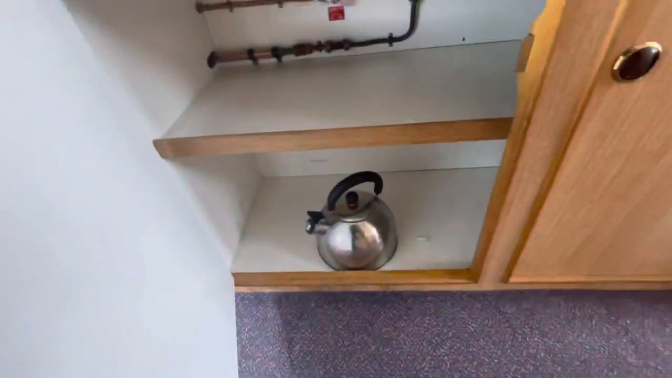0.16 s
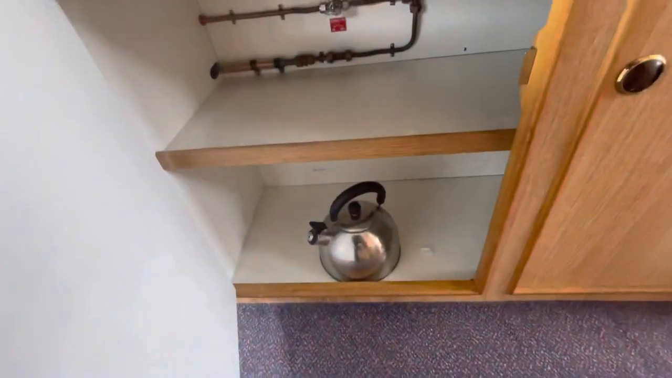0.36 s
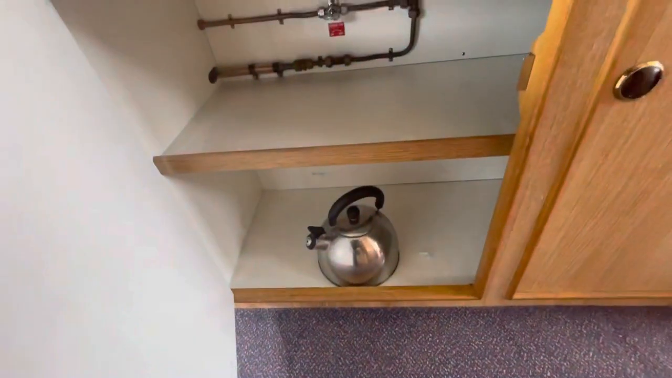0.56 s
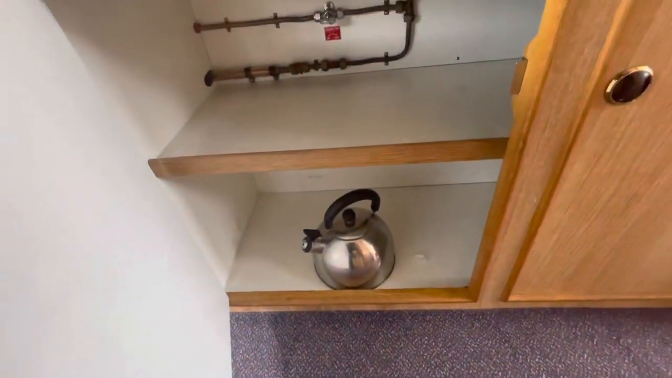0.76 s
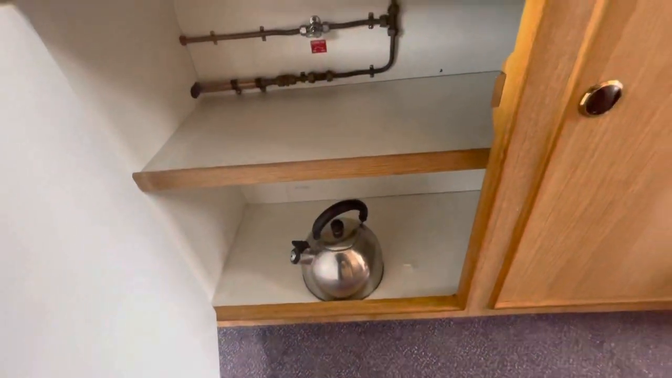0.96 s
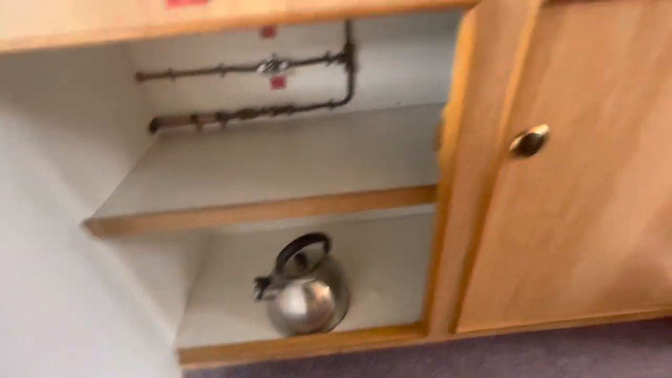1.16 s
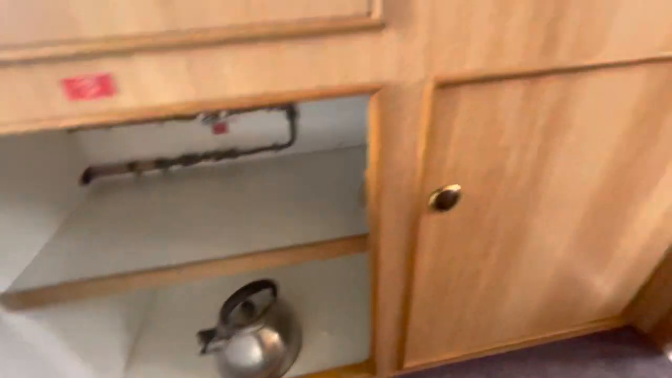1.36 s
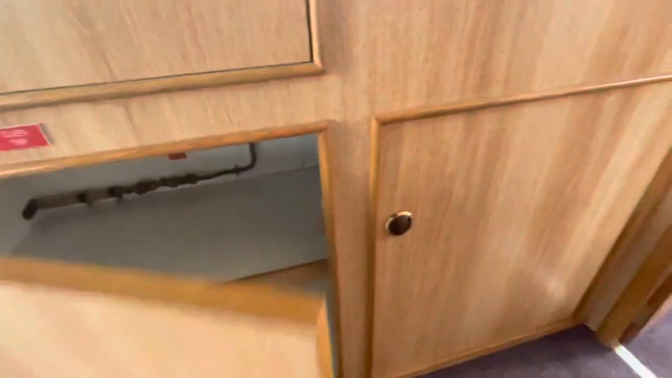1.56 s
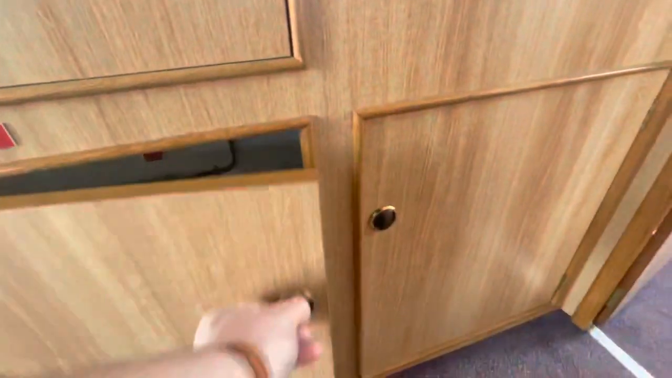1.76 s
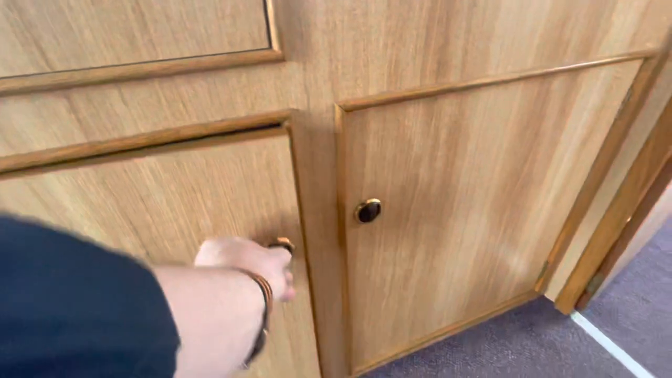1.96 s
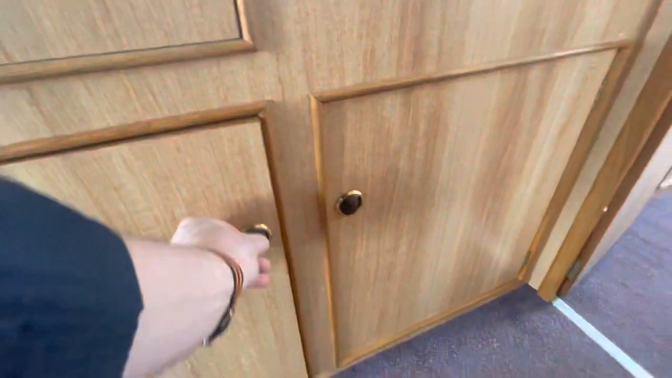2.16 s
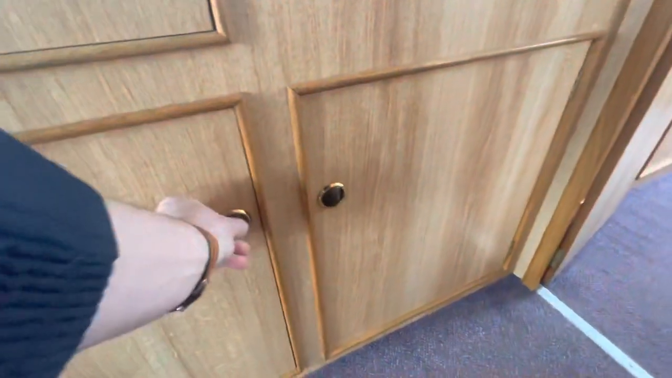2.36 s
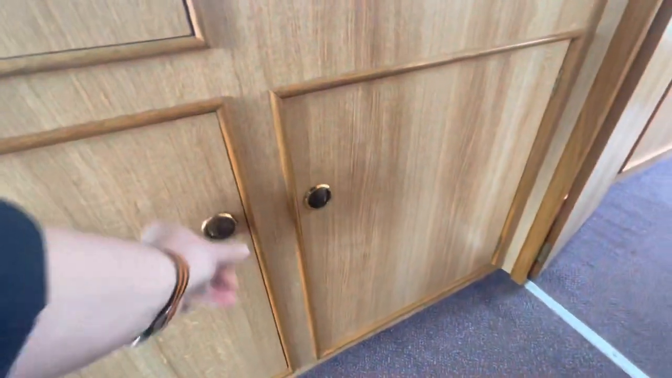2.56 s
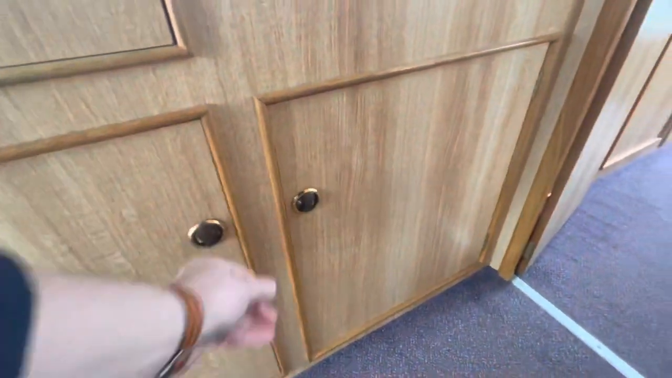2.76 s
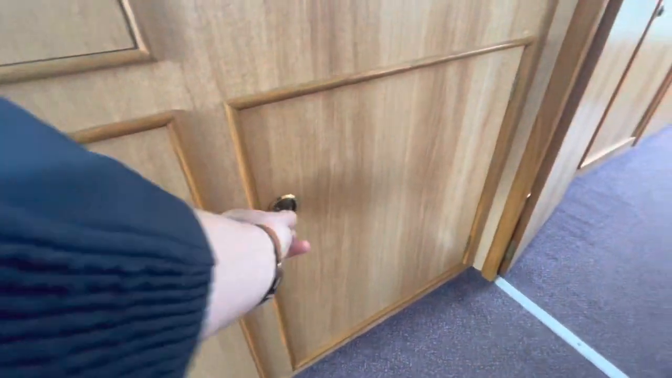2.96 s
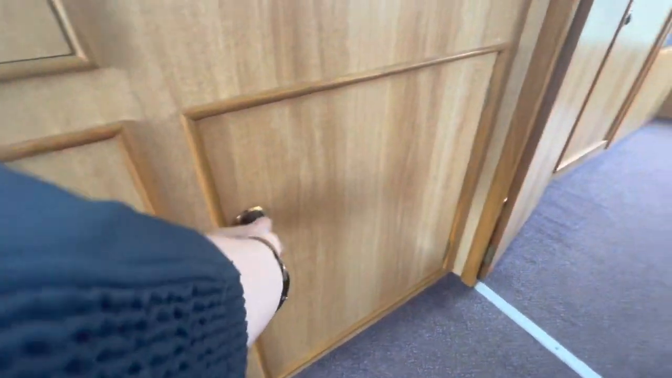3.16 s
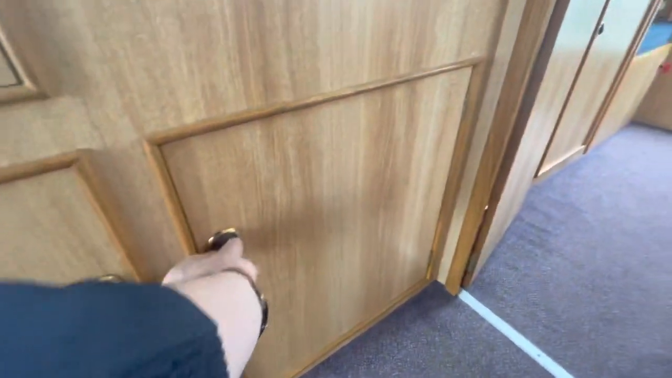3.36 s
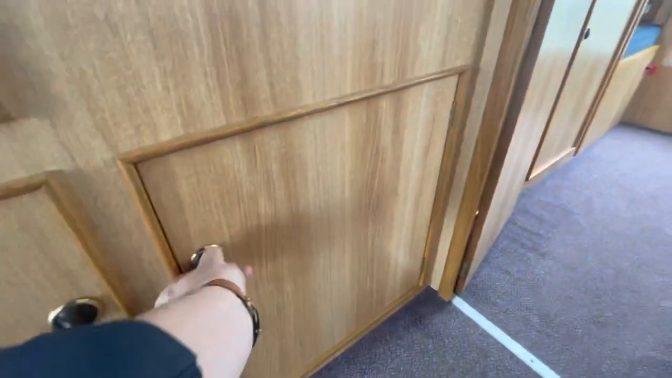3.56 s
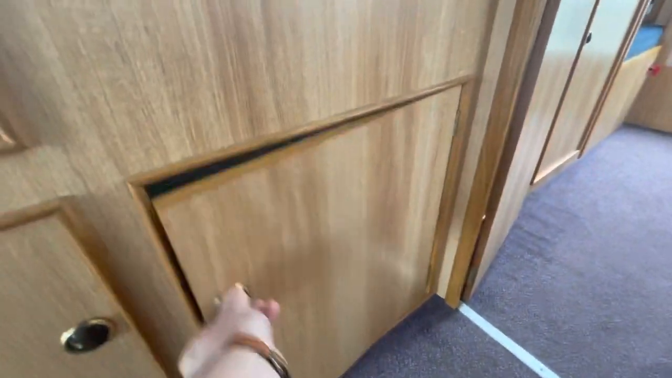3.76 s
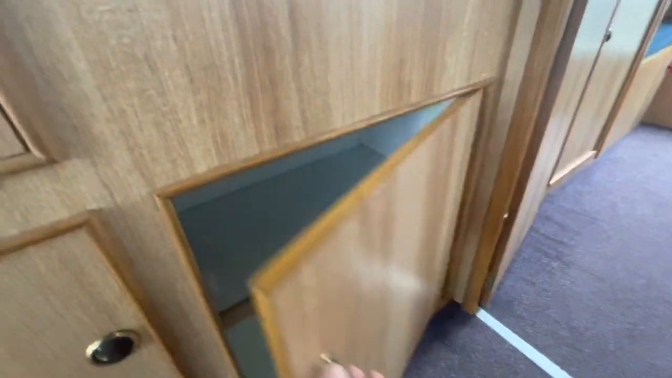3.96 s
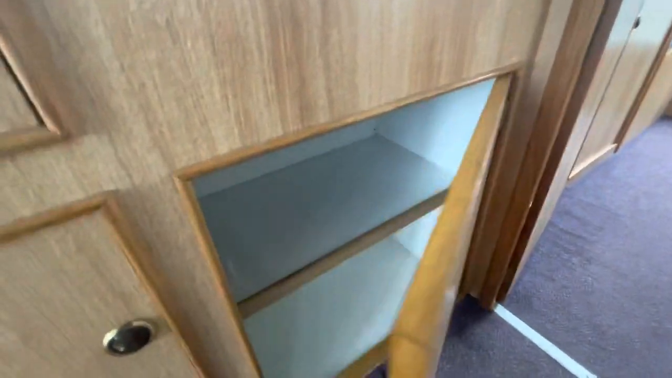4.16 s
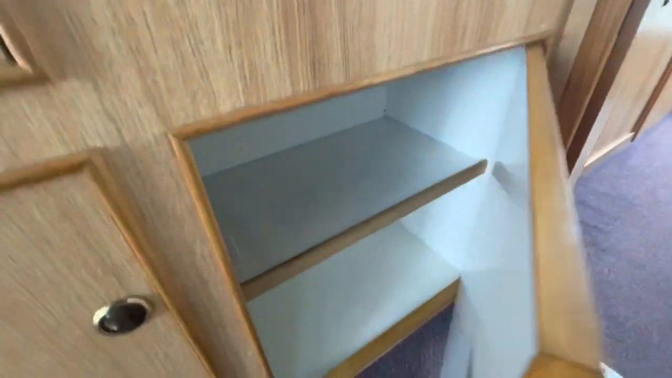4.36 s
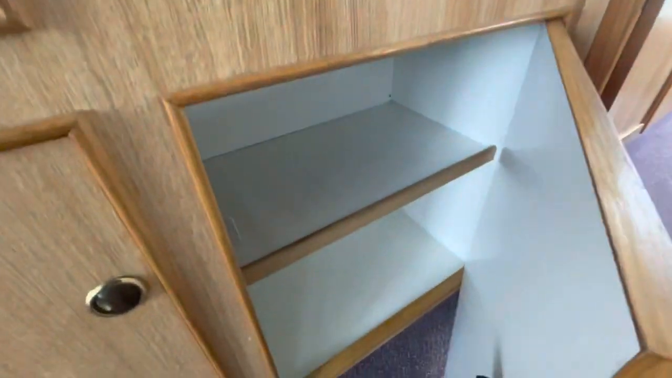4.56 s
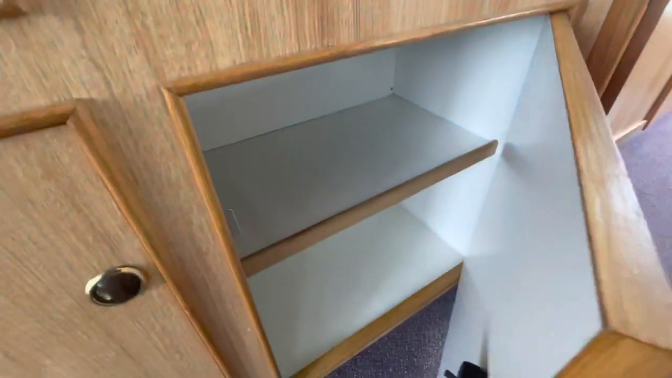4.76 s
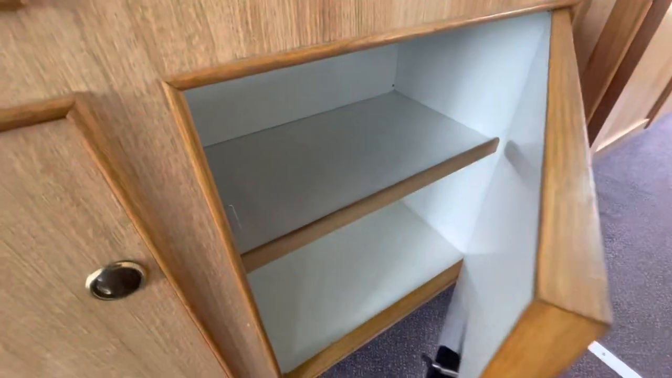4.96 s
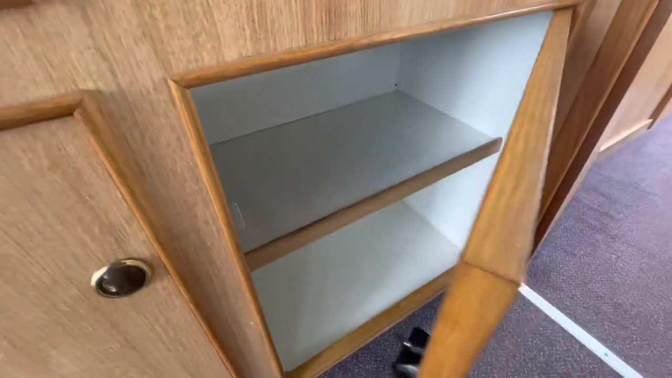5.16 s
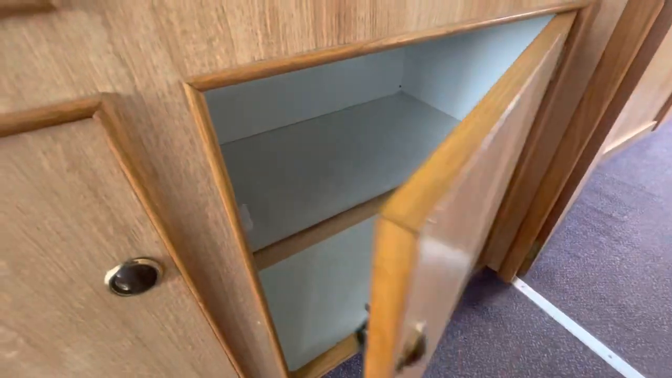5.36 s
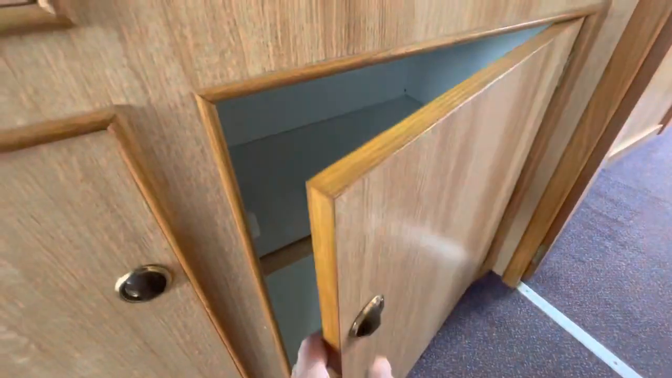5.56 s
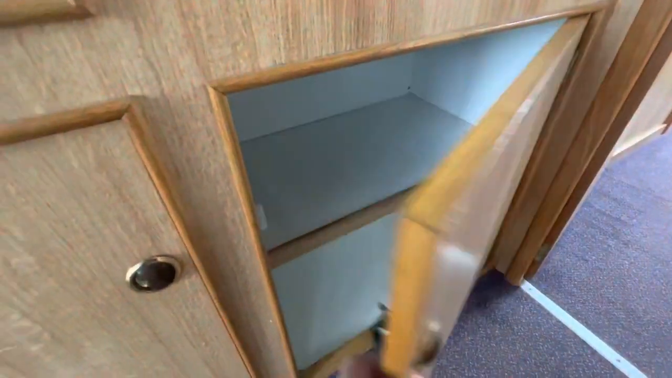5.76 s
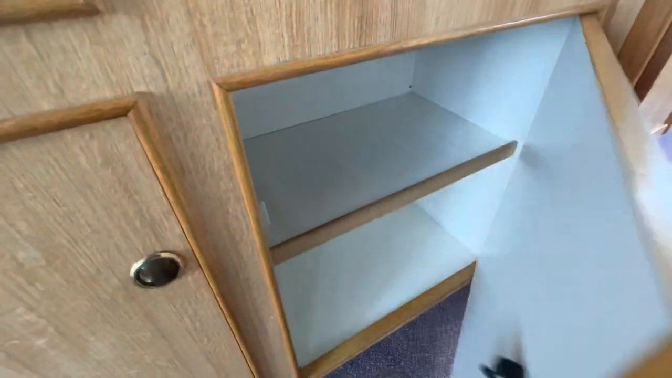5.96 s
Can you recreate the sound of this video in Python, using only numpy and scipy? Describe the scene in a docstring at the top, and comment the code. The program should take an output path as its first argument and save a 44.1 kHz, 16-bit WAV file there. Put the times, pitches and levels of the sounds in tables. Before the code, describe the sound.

Handheld stereo microphones near galley cupboards, with short dry reflections and faint low hum. Soft cloth movement and creaky hinge rubs lead to a wooden bump, then the heaviest clunk with a bright spring click. Small knob rattles and a faint hollow, wavering tone follow. The next door's catch releases thinly, its edge scrapes, then it swings quietly with dry ticks, small loose jolts and a final light clack.

```python
"""Galley cupboard doors.

Small wooden doors in a boat: one is swung to and pushed home on its catch; the next is pulled free,
scrapes out of its frame and swings on clicking hinges. Contacts are noise cracks plus ringing modes,
heavier blows boom in the hollow cabinet, rubbing is trains of random slips driving panel modes.
A low hum and shaped noise for still air and a rustling sleeve lie beneath."""
import sys
import numpy as np
from scipy import signal
from scipy.fft import rfft, irfft, next_fast_len
from scipy.io import wavfile
from scipy.ndimage import uniform_filter1d

SR = 44100
rng = np.random.default_rng(int(sys.argv[2]) if len(sys.argv) > 2 else 0)


def wrap_up_sound(samples):
    """Save the sound to the file named by the first command line argument, as 16-bit audio."""
    columns = np.atleast_2d(samples).T
    # keep every value between -1 and 1, then stretch to whole-number steps
    tamed = np.clip(columns, -1, 1)
    steps = np.round(tamed * 32767).astype(np.int16)
    wavfile.write(sys.argv[1], SR, steps)


N = 265482
TIME = np.arange(N) / SR


def amp(db):
    """Decibels to gain."""
    return 10 ** (np.asarray(db) / 20)


def leaned(x, left_db):
    """Level difference between the channels, half on each; positive is left."""
    return x * amp([[left_db / 2], [-left_db / 2]])


def read(points, hz):
    """Interpolates a spectrum table on a log-frequency axis."""
    f, value = np.transpose(points)
    return np.interp(np.log(hz + 1), np.log(f + 1), value)


def add(mix, s, sound):
    """Mixes a sound in at s seconds."""
    part = mix[:, round(s * SR):][:, :sound.shape[1]]
    part += sound[:, :part.shape[1]]


def colour(x, points):
    """Filters by a (Hz, dB) table."""
    size = next_fast_len(x.shape[1] + SR // 10)
    gain = amp(read(points, np.fft.rfftfreq(size, 1 / SR)))
    return irfft(rfft(x, size) * gain, size)[:, :x.shape[1]]


def band_rms(x, lo=0, hi=SR):
    """Rms of the part of x between two frequencies."""
    hz = np.fft.rfftfreq(x.shape[1], 1 / SR)
    power = abs(rfft(x)[:, (hz >= lo) & (hz < hi)]) ** 2
    return np.sqrt(2 * power.sum(1).mean() + 1e-20) / x.shape[1]


def highpass(x, hz):
    """Third-order high-pass."""
    return signal.sosfilt(signal.butter(3, hz, "high", fs=SR, output="sos"), x)


def resonate(x, hz, q):
    """One resonance of peak gain 1."""
    return signal.lfilter(*signal.iirpeak(hz, max(q, 1), SR), x)


def steadied(x, size):
    """Evens out slow changes of power, keeps the grain."""
    power = uniform_filter1d(np.mean(np.atleast_2d(x) ** 2, 0), size)
    return x / np.sqrt(abs(power) + 1e-20)


def lumps(lump_s):
    """Random curve of about unit size with a new knot every lump_s."""
    knots = np.arange(0, N / SR + lump_s, lump_s)
    return np.interp(TIME, knots, np.clip(rng.standard_normal(len(knots)), -1.5, 1.5))


# likeness of the two channels [f/Hz, correlation/1]
CHANNEL_LIKENESS = [(60, 0.94), (150, 0.86), (300, 0.086), (700, 0.1), (2000, 0.051), (8000, 0),
                    (11500, 0.09), (16000, 1)]


def noise(size):
    """White noise at two microphones, correlated by frequency."""
    a, b = rfft(rng.standard_normal((2, size)))
    same = np.clip(read(CHANNEL_LIKENESS, np.fft.rfftfreq(size, 1 / SR)), -1, 1)
    return irfft(np.array([a, same * a + np.sqrt(1 - same ** 2) * b]), size)


def ring(modes, t, pitch=1):
    """Sum of dying modes, phased apart at the two microphones as their likeness asks."""
    hz, db, t60 = np.transpose(modes)[:, :, None]
    likeness = np.clip(read(CHANNEL_LIKENESS, hz), -1, 1)
    apart = np.arccos(likeness) / 2 * rng.choice([-1, 1], hz.shape)
    fade = amp(db - 60 * t / t60)
    return np.array([(fade * np.sin(2 * np.pi * hz * pitch * t + side * apart)).sum(0) for side in (-1, 1)])


# reverberation of the cabin [f/Hz, t60/s]
CABIN_T60 = [(60, 1), (150, 1), (300, 0.69), (700, 0.3), (2000, 0.19), (5000, 0.15), (14000, 0.14)]


def cabin_tail(size):
    """Dense reflections as noise, each band dying at its own speed."""
    hz, t, z = signal.stft(noise(size), SR, nperseg=256)
    decay = amp(-60 * t / read(CABIN_T60, hz)[:, None])
    return signal.istft(z * decay, SR)[1][:, :size]


STROKE_SAG_DB = 1  # drop at both ends of a stroke


def stroke(start, length, db, rise_s, fall_s):
    """Gain of one movement: swells, arches gently while it lasts, dies away."""
    along = np.clip((TIME - start) / length, 0, 1)
    early, late = np.maximum(start - TIME, 0), np.maximum(TIME - start - length, 0)
    return amp(db - STROKE_SAG_DB * (2 * along - 1) ** 2) * np.exp(-early / rise_s - late / fall_s)


def slips(per_s, spread_db):
    """Friction as a random train of small slips of uneven size and either sign."""
    size = amp(spread_db * np.minimum(rng.exponential(1, N), 3))
    return (rng.random(N) < per_s / SR) * rng.choice([-1, 1], N) * size


def friction(tone, modes, ring_db, per_s, spread_db, grain_s, vary_db, count=4):
    """Quick slips at several spots shake a panel; each spot rings its modes in another balance."""
    t, out = np.arange(SR // 5) / SR, np.zeros((2, N))
    for _ in range(count):
        spot = [(hz, db + vary_db * rng.uniform(-1.1, 1), t60) for hz, db, t60 in modes]
        grain = noise(len(t)) * np.exp(-t / grain_s) + amp(ring_db) * ring(spot, t)
        out += signal.oaconvolve(slips(per_s / count, spread_db)[None], grain, axes=1)[:, :N]
    return colour(out, tone)


def rubbing(rub, rows, sing_db, q, rise_s, fall_s):
    """Strokes of friction; the point of contact favours one resonance in each."""
    out = np.zeros((2, N))
    # overlapping strokes add in power
    total = np.sqrt(sum(stroke(*row[:3], rise_s, fall_s) ** 2 for row in rows) + 1e-20)
    for start, length, db, hz in rows:
        voiced = rub + amp(sing_db) * resonate(rub, hz, q)
        gain = stroke(start, length, db, rise_s, fall_s)
        out += voiced / voiced.std() * gain ** 2 / total
    return out


# edges of the bands in which a contact is levelled [f/Hz]
BAND_EDGES_HZ = [200, 700, 2000, 6000, 15000]
# first instant of a contact [f/Hz, level/dB]
CRACK_COLOUR = [(200, -3), (900, -1), (3000, -6), (15000, -7)]
# dense ringing of panels and cabin [f/Hz, density/(dB per Hz)]
WOOD_COLOUR = [(60, -30), (150, 0), (300, -1.5), (450, 0.5), (900, -2.5), (1250, -6), (1620, -5.5),
               (2300, -1), (2700, -4), (3700, -1), (5100, -5), (5900, -5), (8500, -2.5), (10500, -7),
               (14500, -8), (16000, -20)]
MODES_DB = -12


def knocks(rows, arch_db, modes_at, tail_db, crack_db, crack_s, rise_s, trim_db):
    """Contact = short crack + ringing modes + cabin tail; band levels arch around its brightness."""
    out, t = np.zeros((2, N)), np.arange(SR // 2) / SR
    bands = list(zip(BAND_EDGES_HZ, BAND_EDGES_HZ[1:]))
    centres = np.sqrt(np.prod(bands, axis=1))
    octaves = np.log2(centres / 1000)
    for s, db, brightness, contact_s, left_db in rows:
        band_db = db - arch_db * (octaves - brightness) ** 2  # arch_db: drop one octave away
        crack = amp(crack_db) * colour(noise(len(t)), CRACK_COLOUR) * np.exp(-t / crack_s)
        tail = amp(tail_db) * cabin_tail(len(t)) + amp(MODES_DB) * ring(modes_at(s), t)
        press = 1 - np.exp(-t / max(contact_s, 1 / SR))  # force builds up while the surfaces meet
        hit = colour(press * (crack + tail * (1 - np.exp(-t / rise_s))), WOOD_COLOUR)
        for _ in range(2):  # bring the first 20 ms to the band levels
            now_db = [20 * np.log10(band_rms(hit[:, :SR // 50], *band)) for band in bands]
            hit = colour(hit, np.c_[centres, band_db - now_db])
        add(out, s, leaned(hit, left_db) * amp(trim_db))
    return out


# machine hum [f/Hz, level/dB rms]
MACHINE_HUM = [(59.2, -50.5)]
# still air [f/Hz, density/(dB per Hz)]
AIR_COLOUR = [(20, -8), (45, -1), (70, -3), (110, -14), (160, -16), (215, -11), (400, -22), (570, -14),
              (850, -26), (1600, -27), (3200, -35), (5600, -38), (8400, -32), (12000, -42)]


def wander():
    """Slow random curve: 18 sines from 0.3 to 5 Hz."""
    return sum(np.sin(2 * np.pi * (f * TIME + rng.random())) for f in np.geomspace(.3, 5, 18)) / 3


def background(right_db=2.0, air_db=-69):
    """A sine hum with slight drift in pitch and level, over shaped noise for still cabin air."""
    drift, throb = wander(), wander()
    hz, db = MACHINE_HUM[0]
    phase = 2 * np.pi * np.cumsum(hz + .4 * drift) / SR
    hum = np.sqrt(2) * amp(db + .7 * throb) * np.sin(phase)
    air = colour(noise(N), AIR_COLOUR)
    air *= amp(air_db) / band_rms(air, 150, 16000)
    return leaned(hum, -right_db) + air


# cloth rustle [f/Hz, density/(dB per Hz)]
RUSTLE_COLOUR = [(100, 9), (200, 6.5), (400, -5.5), (600, 4.5), (850, -0.5), (1200, 2), (1800, -1.5),
                 (3300, -4), (5000, -15), (8000, -35.5)]
# fine cloth hiss [f/Hz, density/(dB per Hz)]
HISS_COLOUR = [(1500, -23.5), (3500, -8), (4800, -0.5), (5600, -6), (6800, 2.5), (7600, -6), (8500, 3.5),
               (10500, -9.5), (12500, -7), (14500, -10.5), (15500, -21.5)]
# arm reaches, pulls or draws back [t/s, length/s, rustle level/dB, hiss level/dB]
ARM_MOVES = [(0.0, 0.096, -73, -68), (0.914, 0.6, -66.5, -72.5), (1.19, 0.76, -63, -62),
             (2.092, 0.05, -56, -63), (2.27, 0.22, -67, -71), (2.49, 0.89, -61, -63.5),
             (2.843, 0.6, -58, -63.5), (3.593, 0.81, -64, -64), (4.656, 0.2, -76.5, -71),
             (5.287, 0.087, -64.5, -63.5), (5.717, 0.33, -76.5, -74)]


def sleeve(grain_db=1.0):
    """Cloth rustles in small uneven patches under a fine hiss as the arm moves."""
    patches = uniform_filter1d(rng.standard_normal(N), SR // 80)
    rustle = colour(noise(N) * amp(grain_db * patches / patches.std()), RUSTLE_COLOUR)
    hiss = colour(noise(N), HISS_COLOUR)
    rustle = rustle / band_rms(rustle, 1800, 4500)
    hiss = hiss / band_rms(hiss, 6000, 9500)
    gains = [stroke(start, length, np.c_[db], rise_s=0.045, fall_s=0.094) for start, length, *db in ARM_MOVES]
    rustle_gain, hiss_gain = np.max(gains, 0)  # the stronger move wins
    return rustle * rustle_gain + hiss * hiss_gain


# hard object set down nearby
# [t/s, level/dB before trim, brightness/octaves re 1 kHz, contact/s, left-right/dB]
SET_DOWN_HITS = [(0.947, -35, -0.053, 0.0043, 1.9)]
# its modes [f/Hz, level/dB, t60/s]
OBJECT_MODES = [(227, 0.5, 0.28), (504, 1.7, 0.16), (576.4, 9, 0.21), (625, 16.9, 0.092), (790, 9, 0.067),
                (849.4, 11, 0.117), (1063, 13, 0.11), (1186, 8, 0.12), (1820, 3, 0.14), (1997, 28, 0.021),
                (2276, 9.5, 0.065)]


def set_down():
    """Something hard lands once: crack plus short modes."""
    return knocks(SET_DOWN_HITS, 3.5, lambda s: OBJECT_MODES, tail_db=-5.0, crack_db=20.0,
                  crack_s=0.0088, rise_s=0.0013, trim_db=3.5)


# faint hollow tone [t/s, length/s, level/dB before swell]
HOLLOW_TONE_STROKE = (2.51, 0.68, -59)
# its resonances [f/Hz before bend, width/Hz per pass, level/dB]
HOLLOW_TONE_RESONANCES = [(688.4, 50, 5), (655, 290, -8.5), (1294, 120, -12.5)]
SWELL_AT_S, SWELL_WIDTH_S, SWELL_DB = 2.694, 0.116, 15


def hollow_tone(left_db=3, bend=0.0127):
    """Random pulses through doubled resonances: a grainy tone, wavering, pitch lifted at its swell."""
    drive = slips(per_s=500, spread_db=2)
    swell = np.exp(-((TIME - SWELL_AT_S) / SWELL_WIDTH_S) ** 2)
    tone = np.zeros(N)
    for hz, width_hz, db in HOLLOW_TONE_RESONANCES:
        q = hz / width_hz
        tone += amp(db) * resonate(resonate(drive, hz, q), hz, q)
    speed = 1 + bend * swell + .018 * lumps(.02)
    tone = np.interp(np.cumsum(speed), np.arange(N), tone)
    envelope = stroke(*HOLLOW_TONE_STROKE, rise_s=0.023, fall_s=0.029) * amp(SWELL_DB * swell)
    flutter = amp(2.5 * lumps(.016))
    return leaned(steadied(tone, size=SR // 22) * flutter * envelope, left_db)


# hinge rub [f/Hz, density/(dB per Hz)]
HINGE_COLOUR = [(100, -4.5), (220, -3.5), (400, 0.5), (600, -5), (850, -4), (1200, 1), (1600, -3),
                (3000, -13), (6000, -21.5)]
# swinging panel driven by the rub [f/Hz, level/dB before variation per spot, t60/s]
SWING_MODES = [(212.2, -1, 0.23), (417, -2.5, .15), (579, 2, 0.26), (732, 0, .14), (854.4, 3.5, 0.21),
               (1076.4, -1, 0.14), (1144, 0, 0.11), (1370, 0, 0.1), (1590, -4.5, 0.083), (2260, -3, .08),
               (2720, -2, .08)]
# door rubs on its hinges [t/s, length/s, level/dB, favoured f/Hz]
SWING_STROKES = [(1.2, 0.1, -55.5, 870), (1.351, 0.06, -53.5, 1199), (1.41, 0.089, -54, 580),
                 (1.543, .01, -53.5, 603), (1.646, 0.016, -53, 860), (1.689, 0.03, -50.5, 1072),
                 (1.733, 0.05, -48, 1140), (1.87, 0.02, -54.5, 1130), (3.753, 0.37, -66, 580),
                 (4.287, 0.207, -64.5, 750), (5.273, 0.22, -71, 595)]


def hinges(left_db=1):
    """Dry hinges rub softly while a door swings: dense small slips into the panel's modes."""
    rub = friction(HINGE_COLOUR, SWING_MODES, ring_db=-21, per_s=320, spread_db=3, grain_s=0.003, vary_db=4)
    rub = steadied(rub, size=SR // 20)
    return leaned(rubbing(rub, SWING_STROKES, sing_db=-1.5, q=7, rise_s=0.007, fall_s=0.02), left_db)


# dry hinge ticks late in the swing
# [t/s, level/dB, brightness/octaves re 1 kHz, contact/s, left-right/dB]
HINGE_TICKS = [(4.296, -52, 0.18, 0.0063, 0.82), (4.366, -63, -.6, .002, 0.31),
               (4.383, -54.5, 0.62, 0.0026, -1), (4.393, -55.5, -0.93, 0.0031, 0),
               (4.45, -61.5, 0.6, 0.0031, 0.93), (4.468, -60.5, -0.16, 0.0018, 1)]
# hinge ringing [f/Hz, level/dB, t60/s]
HINGE_TICK_MODES = [(585, 3, 0.087), (1040, -0.5, .14), (1500, -2, 0.065), (2530, -1, 0.066),
                    (2940, -5.5, 0.074), (3420, -9, .07), (7000, -9, .04)]


def ticks():
    """Small contacts in a dry hinge."""
    return knocks(HINGE_TICKS, 1.5, lambda s: HINGE_TICK_MODES, tail_db=-10, crack_db=10,
                  crack_s=.003, rise_s=.001, trim_db=0)


# open door jolts in the play of its hinges
# [t/s, level/dB before trim, brightness/octaves re 1 kHz, contact/s, left-right/dB]
DOOR_JOLTS = [(4.205, -44, 0.49, 0.00091, -11.5), (4.214, -50, -0.69, 0.0018, -7),
              (5.245, -51, 0.35, 0.0027, -3), (5.256, -45, -2.1, .002, -10), (5.275, -52, -0.47, .001, -5),
              (5.404, -45, -1.8, 0.0017, -10.5), (5.415, -52, -0.027, .001, -1),
              (5.61, -61.5, -.2, 0.0044, -3)]
# loose panel [f/Hz, level/dB, t60/s]
LOOSE_MODES = [(363.5, -4.5, 0.19), (576, 6, 0.2), (711, 3, 0.13), (1230, -1.5, .1), (1570, -3, 0.13),
               (2105, -9, 0.11), (2600, -2.5, .05)]


def jolts():
    """Play in the hinges lets the open door knock; its loose panel rings."""
    return knocks(DOOR_JOLTS, 3, lambda s: LOOSE_MODES, tail_db=-8.5, crack_db=10,
                  crack_s=0.0029, rise_s=0.00074, trim_db=-3)


# dry surfaces chirp as they slip [t/s, length/s, f/Hz, level/dB]
SLIP_CHIRPS = [(2.051, 0.018, 1180, -41), (2.168, .006, 2280, -23), (3.091, 0.033, 1505, -45),
               (5.399, 0.012, 1605, -52)]
CHIRP_Q = 19  # per pass


def chirps():
    """A brief slip sings in one resonance: noise through it twice."""
    out = np.zeros((2, N))
    for s, length, hz, db in SLIP_CHIRPS:
        size = max(round(length * SR), 16)
        tone = resonate(resonate(noise(SR // 5), hz, CHIRP_Q), hz, CHIRP_Q)[:, -size:]
        add(out, s, amp(db) * tone / band_rms(tone) * signal.windows.tukey(tone.shape[1], .5))
    return out


# loose knob rattles in the hand
# [t/s, level/dB, brightness/octaves re 1 kHz, contact/s, left-right/dB]
KNOB_RATTLES = [(2.052, -45.5, 0.16, 0.0027, 2.4), (2.071, -37, -0.42, .002, 2.5),
                (2.352, -36.5, -0.39, 0.0024, 1), (2.418, -44, 0.43, 0.0028, 1.4)]
# knob and panel around it [f/Hz, level/dB, t60/s]
KNOB_MODES = [(565, -14.5, 0.16), (715, -4.5, .16), (813, 2.5, 0.097), (1100, 2, 0.09), (1190, 0.5, 0.11),
              (1430, -5.5, .1), (1659, 0.5, .11), (2138, -5, 0.11), (3790, -15.5, .05)]


def knob():
    """Loose knob rattles and rings with the panel around it."""
    return knocks(KNOB_RATTLES, 5, lambda s: KNOB_MODES, tail_db=-7, crack_db=12,
                  crack_s=.004, rise_s=.001, trim_db=0)


# edge drag [f/Hz, density/(dB per Hz)]
DRAG_COLOUR = [(71, -32.5), (120, 9.5), (252, 0), (307, 7), (403, -6), (567, -4), (692, -3.5), (1030, -4),
               (1900, -14.5), (2160, -13.5), (9000, -33.5), (11700, -59.5), (19800, -120)]
# grit [f/Hz, density/(dB per Hz)]
GRIT_SPECTRUM = [(300, -24), (1200, -8), (2000, 4), (3200, -3), (4000, -9), (6000, -12), (10000, -26)]
# door singing as its edge drags [f/Hz, level/dB before variation per spot, t60/s]
DRAG_MODES = [(593, 1, 0.044), (1041, 5.5, 0.08), (1136, -3, 0.067), (1610, 1, 0.17), (1770, -4.5, .06),
              (2190, -2, 0.051), (2760, 1, .06), (3340, -2.5, 0.06)]
# door edge drags into or out of its frame [t/s, length/s, level/dB, favoured f/Hz]
DRAG_STROKES = [(2.11, 0.035, -42.5, 1590), (3.533, 0.022, -38, 1390), (3.566, 0.037, -40.5, 1500),
                (3.612, 0.062, -40.5, 1900)]
# edge turns gritty before it comes free [t/s, length/s, level/dB]
GRIT_STROKE = (3.612, 0.039, -48)


def scrape(right_db=3):
    """Door edge drags along its tight frame in a few jerks; a gritty layer swells in on the last."""
    rub = friction(DRAG_COLOUR, DRAG_MODES, ring_db=-25, per_s=700, spread_db=2.5, grain_s=0.0035, vary_db=4)
    rub = steadied(rub, size=SR // 25)
    drag = rubbing(rub, DRAG_STROKES, sing_db=-6, q=3, rise_s=.004, fall_s=0.014)
    grit = friction(GRIT_SPECTRUM, DRAG_MODES, ring_db=-27, per_s=520, spread_db=3, grain_s=0.0015, vary_db=6)
    grit = steadied(grit, size=SR // 25) * stroke(*GRIT_STROKE, rise_s=0.041, fall_s=0.012)
    return leaned(drag + grit, -right_db)


# spring catch [f/Hz, relative level/dB, t60/s before extra damping]
CATCH_MODES = [(1904, -21, .08), (2940, -21.5, .07), (3250, -22, .07), (3610, -8.5, .04), (4380, -2, 0.012),
               (4754, -2.5, 0.0054), (4800, -10, 0.02), (4920, -17.5, .06), (5440, -22.5, 0.06),
               (8100, -11.5, 0.016), (12050, -12, .008), (14200, -15.5, 0.008)]
# catch snaps home or lets go [t/s, gain/dB, high-pass f/Hz, extra damping/(dB/s)]
CATCH_SNAPS = [(2.1773, -5.5, 1790, 500), (2.181, -2.5, 1195, 298), (3.494, -32, 3300, 5000),
               (3.5135, -18.5, 3400, 5997)]


def snaps(tail_db=-27, rise_s=.00012):
    """Small spring catch rings for milliseconds; letting go, it is thinner and damped by the hand."""
    out, t = np.zeros((2, N)), np.arange(SR // 5) / SR
    for s, db, lowest_hz, damping_db_per_s in CATCH_SNAPS:
        spring = ring(CATCH_MODES, t) * (1 - np.exp(-t / rise_s)) * amp(-abs(damping_db_per_s) * t) / 2
        tail = amp(tail_db) * colour(cabin_tail(len(t)), WOOD_COLOUR)
        add(out, s, amp(db) * highpass(spring + tail, lowest_hz))
    return out


# hollow cabinet [f/Hz before pitch factor, relative level/dB, t60/s before extra damping]
CABINET_MODES = [(49.45, -16, 0.84), (76, -0.5, 0.14), (101.54, -1, 0.41), (133.5, -14, 0.58),
                 (185.3, -9.5, 0.16), (232, -16.5, 0.27)]
# blows that shake it [t/s, gain/dB, contact/s, pitch factor/1, extra damping by the hand/(dB/s)]
CABINET_THUMPS = [(1.943, -7.5, 0.0041, 1.03, 110.5), (2.081, -24.5, 0.0032, 1.4, 49),
                  (2.153, -20, 0.0046, .95, 47), (2.195, -5.5, 0.0045, .98, 8),
                  (2.372, -8.5, 0.016, 1.04, 18.5), (2.489, -29, 0.0035, 0.9, 9),
                  (2.626, -33.5, 0.0061, 0.99, 5.5), (2.995, -42.5, .004, .85, 30),
                  (3.079, -41, .003, 1.1, 40.5), (3.529, -20.5, 0.0061, 0.94, 300.5),
                  (3.538, -24.5, .005, 1, 399.5), (3.676, -24, 0.0017, 1.0, 46),
                  (3.924, -47.5, 0.0016, 1.7, 110), (5.262, -34, 0.0028, 1.2, 97),
                  (5.411, -28.5, 0.0029, 1.2, 247), (5.42, -24, .003, 1.2, 250),
                  (5.433, -28, 0.0043, 1.2, 157)]


def thumps(swell_s=0.0025, rumble_db=-24, rumble_hz=170, right_db=2.0):
    """A soft push sets the hollow cabinet swinging; the hull rumbles on after it."""
    out, t = np.zeros((2, N)), np.arange(SR) / SR
    rumble_band = signal.butter(3, [55, rumble_hz], "band", fs=SR, output="sos")
    for s, db, contact_s, pitch, damping_db_per_s in CABINET_THUMPS:
        rumble = signal.sosfilt(rumble_band, cabin_tail(len(t)))
        rumble *= amp(rumble_db) / band_rms(rumble[:, :SR // 10])
        push = t * np.exp(-t / (contact_s / 6))
        boom = ring(CABINET_MODES, t, pitch) * amp(-abs(damping_db_per_s) * t)
        boom = (boom + rumble) * (1 - np.exp(-t / swell_s))
        add(out, s, amp(db) * signal.fftconvolve(boom, push[None] / push.sum(), axes=1)[:, :len(t)])
    return leaned(out, -right_db)


# door lying in its frame [f/Hz, level/dB, t60/s]
SEATED_MODES = [(300, 2, .18), (336, 9, .22), (375, 3, .14), (420, -2, .12), (518, -3, .16), (611, -9, .18),
                (648, -7, .18), (740, -1, .17), (801, 4, .15), (950, 2, .12), (1046, 2, .14),
                (1221, -2, .14), (1288, -3, .14), (1587, -5, .14), (2063, -2, .12), (2182, -1, .12),
                (2299, -4, .1), (2999, -1, .1), (3750, 1, .08), (4150, -2, .08), (5141, 0, .1)]
# panel of a freely swinging door [f/Hz, level/dB, t60/s]
FREE_MODES = [(230, -6, .22), (370, -7, .18), (583, 4, .26), (740, 3, .17), (830, -2, .14), (1090, -4, .13),
              (1230, 0, .15), (1610, 2, .14), (2080, -2, .12), (2460, -4, .1), (2910, -4, .1),
              (3850, -2, .11)]
# span of the seated door [from t/s, to t/s]
SEATED_SPAN = (1.9, 2.6)


def door_modes(s):
    """Frame and panel ring together while a door is seated; otherwise a freely swinging panel rings."""
    return SEATED_MODES if SEATED_SPAN[0] < s < SEATED_SPAN[1] else FREE_MODES


# catch and hinge stop strike
# [t/s, level/dB before trim, brightness/octaves re 1 kHz, contact/s, left-right/dB]
METAL_CLACKS = [(1.907, -60, 3.2, 0.00063, 2.5), (2.145, -35.5, 1.1, 0.00087, -1.5),
                (2.177, -22.5, 1.1, 0.0003, 4), (2.181, -17.5, 0.4, 0.00054, -0.5),
                (2.184, -32, 4, 0.00076, 0), (4.204, -41, 2.28, 0.0022, -2),
                (5.791, -42, 2.2, 0.0029, -3.5)]


def metal():
    """Metal strikes: short, strong crack, then the door rings."""
    return knocks(METAL_CLACKS, 1.54, door_modes, tail_db=3, crack_db=24,
                  crack_s=.0028, rise_s=0.0012, trim_db=-1)


# wood meets wood or a hand
# [t/s, level/dB, brightness/octaves re 1 kHz, contact/s, left-right/dB]
WOOD_KNOCKS = [(0.082, -72, 1, 0.0019, 14), (1.915, -46, 0.52, 0.004, -2), (1.928, -36.5, 0.27, 0.0017, -2),
               (1.932, -26, -1.32, 0.004, 0), (2.074, -34, -1.04, 0.00083, 0.5),
               (2.146, -20.5, -0.64, 0.0063, -2.5), (2.157, -26.5, -2.2, 0.001, 6),
               (2.167, -30, 0.96, 0.0028, -6), (2.487, -60, -1.1, 0.00053, 15),
               (2.517, -53.5, -0.67, 0.00076, 2), (3.078, -46.5, 0.21, 0.00043, -1),
               (3.1, -54.5, 0.81, 0.0054, 13.5), (3.345, -44.5, 1, 0.0033, -2),
               (3.38, -52.5, 0.12, 0.0014, 1), (3.495, -53.5, -0.67, 0.0025, -1),
               (3.757, -54, -0.11, 0.00069, 1), (5.801, -48, -0.55, 0.0023, -2)]


def wood():
    """Wood meets wood or a hand: crack, then the door rings."""
    return knocks(WOOD_KNOCKS, 2.5, door_modes, tail_db=-2, crack_db=19,
                  crack_s=.0045, rise_s=.001, trim_db=0)


def scene():
    """All that sounds in the galley."""
    beneath = background() + sleeve() + set_down() + hollow_tone()
    swinging = hinges() + ticks() + jolts()
    handling = chirps() + knob() + scrape() + snaps()
    return beneath + swinging + handling + thumps() + metal() + wood()


# difference between the two microphones [f/Hz, left-right/dB]
MIC_LEAN = [(150, -0.5), (350, 1.5), (550, 3), (1000, 2), (2000, 0), (4000, 3.5), (7000, 8.5), (11000, -1)]
EDGE_HZ = 16200


def record(dry):
    """Microphones shed the deepest bass and differ in colour; then clipping and the band limit."""
    heard = colour(dry, [(20, -24), (38, -12), (50, 0), (100, 0)])
    ears = []
    for ear, side in zip(heard, (1, -1)):
        ears.append(colour(ear[None], [(hz, side * db / 2) for hz, db in MIC_LEAN]))
    lowpass = signal.firwin(511, EDGE_HZ, window=("kaiser", 9), fs=SR)
    return signal.oaconvolve(np.clip(np.vstack(ears), -.9, .9), lowpass[None], "same")


dry = scene()
out = record(dry)
wrap_up_sound(out)
```